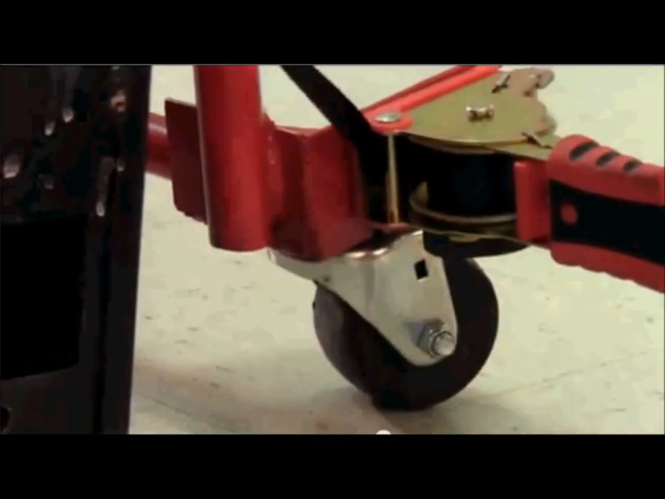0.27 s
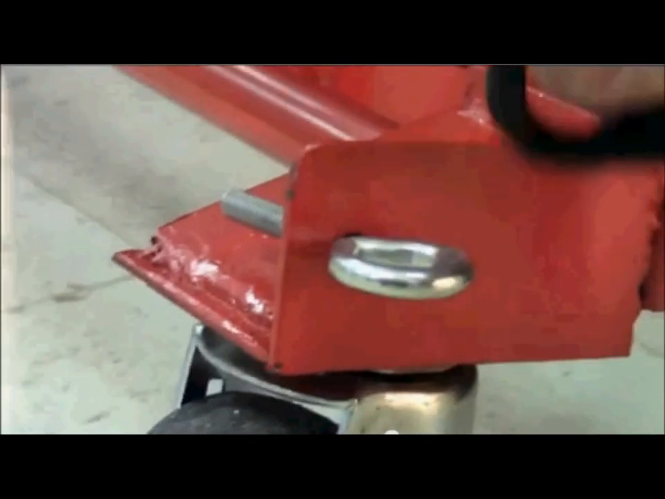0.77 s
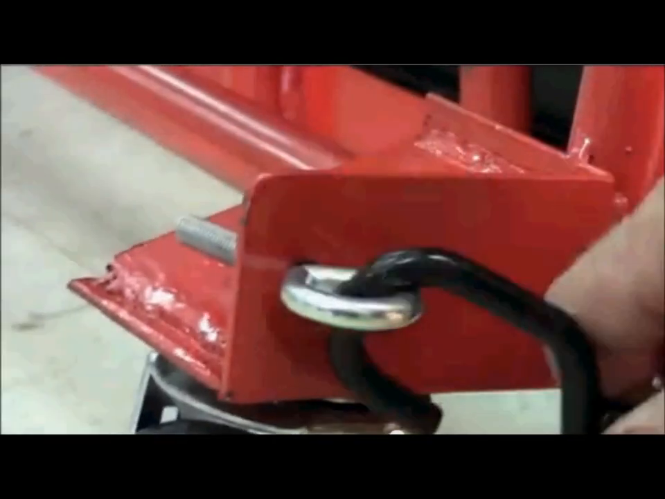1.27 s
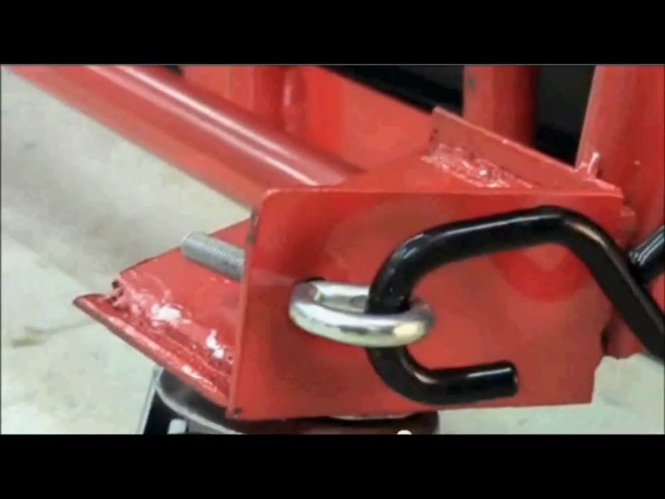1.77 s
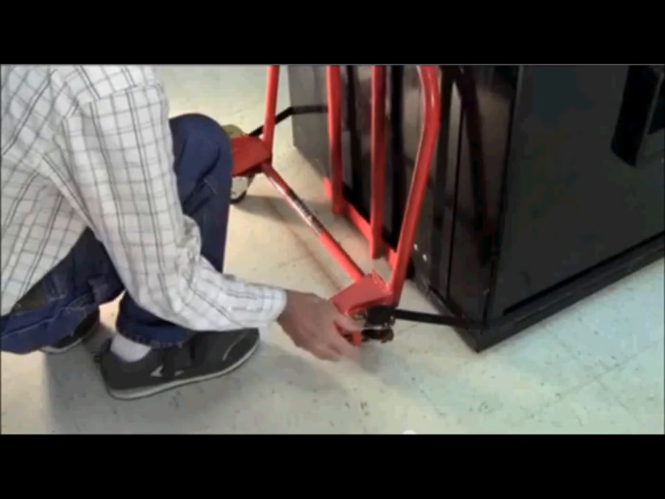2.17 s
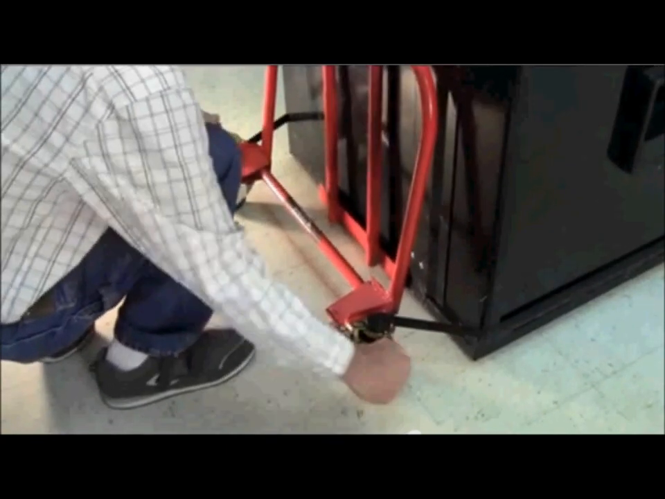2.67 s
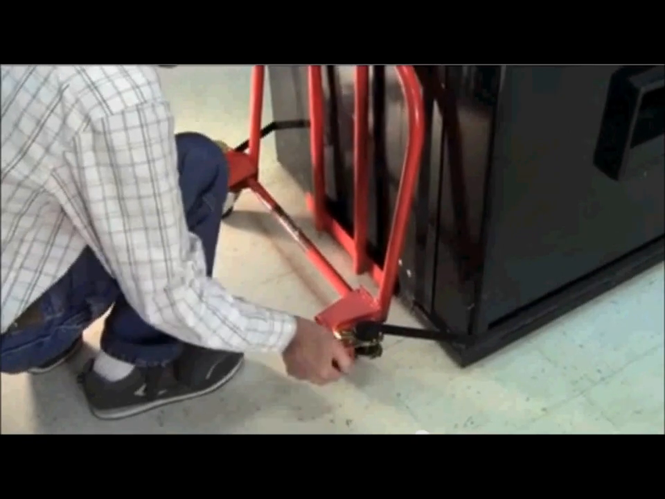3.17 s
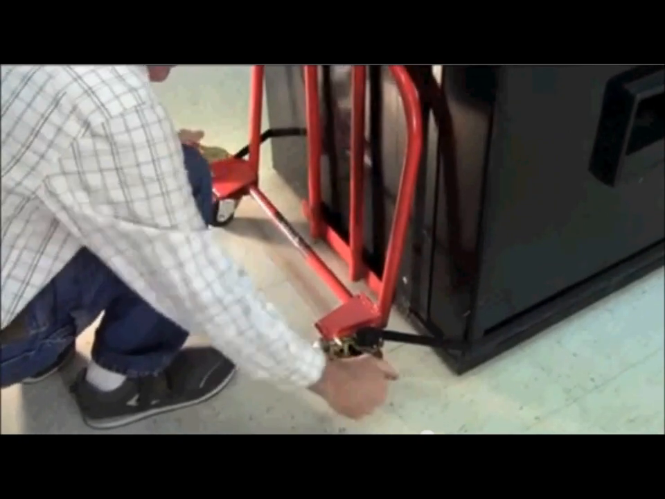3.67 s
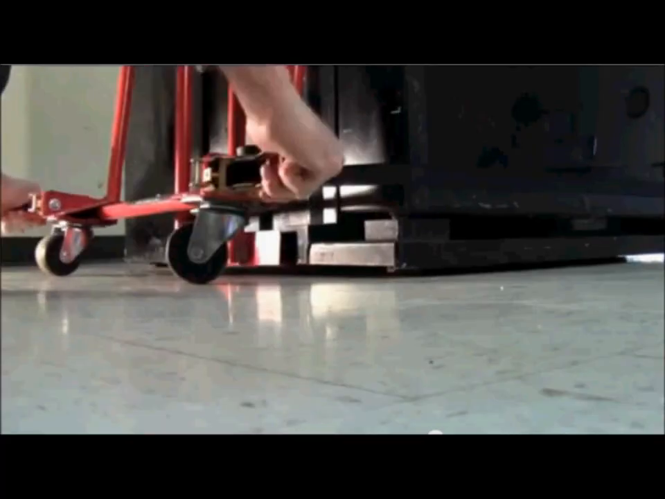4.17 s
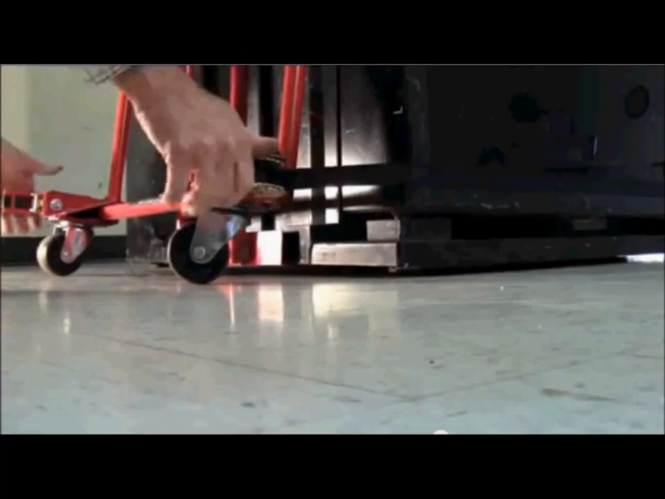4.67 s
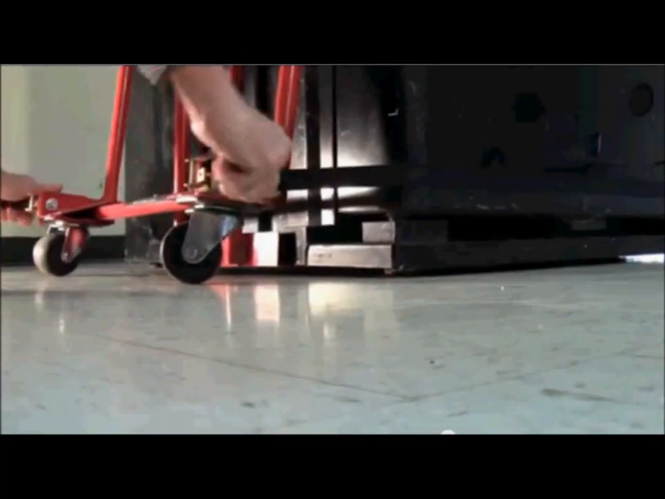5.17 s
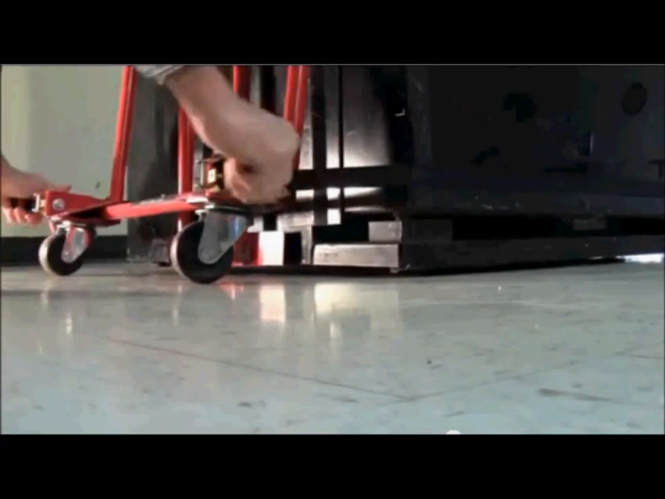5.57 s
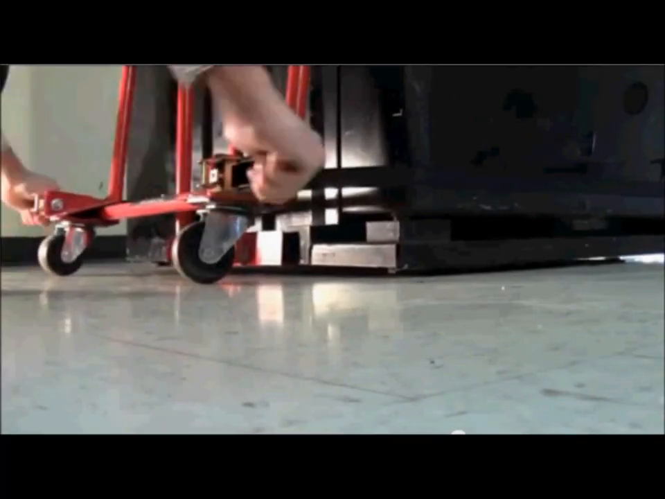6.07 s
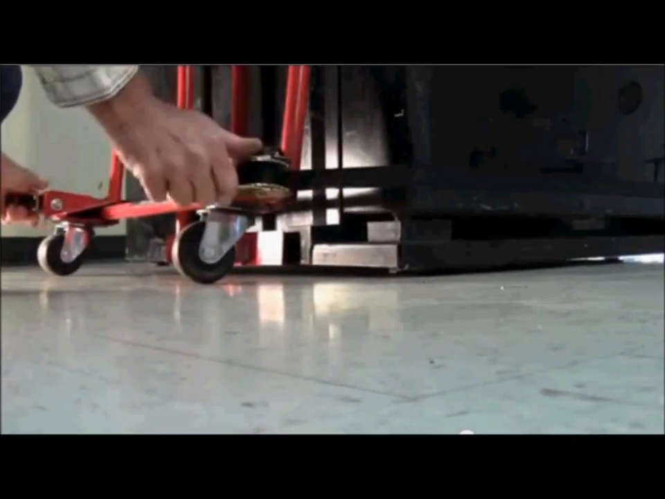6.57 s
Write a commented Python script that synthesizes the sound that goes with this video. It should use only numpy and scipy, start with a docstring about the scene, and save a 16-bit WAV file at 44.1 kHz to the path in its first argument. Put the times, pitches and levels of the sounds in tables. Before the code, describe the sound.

A strap hook scrapes and clanks against a steel dolly, followed by a quieter gap and a dull thud. Then a ratchet is cranked by hand, its pawl snapping over teeth in rapid clusters separated by brief pauses, with buzzing plates, gritty drag and a faint singing tube. Near the end the frame judders and squeaks. Hard indoor room, closer hook, more roomy ratchet.

```python
"""In a hard-floored room, a ratchet strap is cranked tight by hand on a steel moving dolly.
A hook clanks on the frame, then the pawl snaps over the teeth in short bursts: noisy contacts
ring tables of steel resonances. Random slips make the scrapes, buzzes and singing tube; shaped noise
makes the webbing's rub, the casters' rumble and the room's air. Bumps boom in the load, the frame
judders, and the walls return a diffuse tail to the one microphone."""
import sys
import numpy as np
from scipy import signal
from scipy.fft import rfft, irfft, next_fast_len
from scipy.io import wavfile
from scipy.ndimage import uniform_filter1d

SR = 44100
rng = np.random.default_rng(int(sys.argv[2]) if len(sys.argv) > 2 else 0)


def dump(signal):
    """Clip the signal to [-1, 1] and save it as 16-bit WAV at the path in sys.argv[1]."""
    limited = np.clip(np.atleast_2d(signal).T, -1, 1)
    pcm = np.round(limited * 32767).astype(np.int16)
    wavfile.write(sys.argv[1], SR, pcm)


N = 301203
TIME = np.arange(N) / SR
RING_TIME = TIME[:SR // 7]

# resonances of each steel part: f/Hz, width/Hz, relative peak level/dB
PAWL = [(2870, 30, -7), (3066, 73, 5.5), (3361, 80, 8), (3484, 89, 5.5), (3797, 100, -2.5), (3851, 73, 9),
        (4060, 310, 1.5), (4490, 130, 0.5), (4714, 95, 4.5), (5130, 98, 1), (5438, 284, 2), (6403, 420, 2),
        (6650, 270, -28), (7210, 510, -3.5), (7650, 137, 3)]
PAWL_TIP = [(8970, 88, -13), (8770, 86, -12.5), (9052, 80, -6), (10100, 100, -25)]
PLATES = [(1989, 29, 0.5), (2045, 92, 11), (2294, 92, 10), (2402, 25, 10.5), (2433, 32, 8.5),
          (2330, 70, -22.5), (2475, 13, 2)]
FRAME = [(432.7, 16, -0.5), (620, 8.3, -49.5), (790, 8.9, -35), (830, 24, -31), (992, 11, 5.5),
         (1079, 44, 0), (1100, 24, -23), (1290, 32, -3), (1422, 62, 0), (1476, 33, 5), (1585, 38, 5.5),
         (1682, 33, 11.5), (1620, 26, -22), (1780, 14, -27.5)]
HOOK = [(995, 82, -3.5), (1030, 150, -12), (1160, 150, -19), (1386, 18, 2), (1520, 23, -0.5), (1632, 73, 2),
        (1793, 90, -4.5), (2107, 93, -0.5), (1976, 140, -5.5), (2357, 35, 1)]
# strokes in which the pawl drags over the teeth: start t/s, end t/s, grit level/dB
STROKES = [(1.572, 1.753, -38), (1.938, 2.226, -32.5), (2.415, 2.568, -30.5), (2.694, 3.093, -37.5),
           (3.236, 3.392, -35.5), (3.473, 3.772, -37), (3.968, 4.157, -42.5), (4.537, 4.838, -46.5),
           (5.132, 5.29, -44), (5.523, 5.695, -43), (5.867, 6.087, -42.5), (6.178, 6.563, -53)]
# the pawl snaps over a tooth, a few times in each swing of the handle:
# t/s, pawl level/dB, side plate level/dB (both before the part gains), f/Hz where the plates ring most
SNAPS = [(1.613, -9, -7, 2290), (1.6889, -12.5, -10.5, 2175), (1.9612, -11, -13, 2300),
         (1.9877, -12, -8.5, 2180), (2.0224, -8.5, -10, 2200), (2.0318, -13, -10, 2370),
         (2.0841, -6.5, -9.5, 2030), (2.142, -10.5, -11.5, 2100), (2.2235, -9, -10.5, 2350),
         (2.4237, -9.5, -12.5, 2460), (2.4433, -11, -7, 2130), (2.4625, -8.5, -15, 2400),
         (2.4971, -11.5, -15.5, 1960), (2.5384, -12.5, -12, 2500), (2.6067, -14.5, -18, 1950),
         (2.7119, -15.5, -12, 2090), (2.7224, -13.5, -10, 2010), (2.825, -13.5, -12.5, 2300),
         (2.8486, -11.5, -10, 2380), (2.8802, -11.5, -17, 2420), (2.9142, -8.5, -15.5, 1890),
         (2.9288, -12.5, -11.5, 2300), (2.9725, -8, -11.5, 2320), (2.9834, -8.5, -11.5, 2040),
         (3.036, -13.5, -17, 2480), (3.252, -7.5, -7.5, 1910), (3.2969, -16, -12, 2340),
         (3.3501, -10.5, -29, 2350), (3.4633, -13.5, -15, 2520), (3.5401, -13.5, -13, 2290),
         (3.5788, -10.5, -6, 2430), (3.5926, -12.5, -12, 2380), (3.6189, -12.5, -11, 1930),
         (3.6619, -10, -14, 2070), (3.712, -11.5, -10, 2030), (3.7962, -9.5, -10, 2090),
         (4.0193, -12.5, -10, 2300), (4.0664, -9, -14.5, 2400), (4.1209, -12, -11, 1900),
         (4.2442, -10, -12, 2340), (4.561, -9, -12, 2170), (4.5999, -15, -9, 2470),
         (4.6834, -11, -10.5, 1970), (4.753, -11.5, -14, 2300), (4.816, -9.5, -7, 2340),
         (4.9034, -13, -7.5, 2070), (5.1428, -11, -13.5, 2460), (5.1886, -11, -18, 1960),
         (5.2268, -12, -16.5, 2426), (5.2652, -10.5, -15.5, 2500), (5.5383, -11.5, -8, 2000),
         (5.5857, -10.5, -10, 2390), (5.6242, -9, -11.5, 1970), (5.6685, -19, -3.5, 2020),
         (5.877, -14, -7.5, 1915), (5.9359, -14.5, -9.5, 1850), (5.9683, -16.5, -8.5, 2130),
         (5.9988, -14, -13.5, 1950), (6.0426, -15.5, -14, 2360), (6.2105, -17, -9, 2030),
         (6.2611, -16.5, -4, 2020), (6.2751, -11, -6, 2050), (6.352, -14, -9.5, 2310),
         (6.3929, -12, -11, 2320), (6.4213, -15.5, -10.5, 2320), (6.4643, -11.5, -9, 2080),
         (6.7105, -14, -4, 1970), (6.777, -12, -10.5, 2000), (6.8172, -10.5, -11, 2020)]


def from_db(db):
    """Decibels to amplitude gain."""
    return 10 ** (np.asarray(db) / 20)


def rms_one(x):
    """Scale to rms 1."""
    return x / np.sqrt(np.mean(x ** 2) + 1e-20)


def at_hz(points, hz):
    """Read a table of f/Hz and value on a log-frequency axis."""
    points = np.array(points)
    return np.interp(np.log(hz + 1e-9), np.log(points[:, 0]), points[:, 1])


def in_time(rows):
    """Each column of a curve over t/s, read at every sample."""
    s, *columns = np.transpose(rows)
    return [np.interp(TIME, s, column) for column in columns]


def band(x, low_hz, high_hz, order=4):
    """Causal band-pass."""
    edges_hz = [low_hz, min(high_hz, .45 * SR)]
    return signal.sosfilt(signal.butter(order, edges_hz, "band", fs=SR, output="sos"), x)


def add(track, s, sound):
    """Mix a sound in at time s."""
    start = min(max(round(s * SR), 0), N)
    track[start:start + len(sound)] += sound[:N - start]


def noise(spectrum):
    """Steady noise coloured by a table of f/Hz and relative level/dB, rms 1."""
    size = next_fast_len(N)
    hz = np.arange(size // 2 + 1) * SR / size
    coloured = rfft(rng.standard_normal(size)) * from_db(at_hz(spectrum, hz))
    return rms_one(irfft(coloured, size)[:N])


def rings(modes, low_hz, high_hz):
    """One dying sine per resonance, within the band the part radiates; a wide resonance dies fast."""
    hz, width, db = np.transpose(modes)[:, :, None]
    # the factor width keeps each spectral peak at its listed level
    envelope = from_db(db) * width * np.exp(-np.pi * width * RING_TIME)
    return band(envelope * np.sin(2 * np.pi * hz * RING_TIME), low_hz, high_hz)


def blow(partials, chatter_s, swell_s=0.0008, size=900):
    """One contact: a chatter of tiny impacts swells, dies and drives the partials; loudest 5 ms at rms 1."""
    # each contact excites the partials a little differently
    body = from_db(2.5 * rng.standard_normal(len(partials))) @ partials
    t = TIME[:size]
    force = (1 - np.exp(-t / swell_s)) * np.exp(-t / max(chatter_s, 1e-3))
    sound = signal.fftconvolve(force * rng.standard_normal(size), body)
    return sound / np.sqrt(uniform_filter1d(sound[:size] ** 2, size=220).max())


def friction(partials, slips_per_s):
    """Random small slips excite a set of resonances; rms 1."""
    slips = (rng.random(N) < slips_per_s / SR) * rng.standard_normal(N)
    return rms_one(signal.oaconvolve(slips, partials.sum(axis=0))[:N])


def swell(start, peak, end):
    """Contact pressure that builds and lets go; silent where the end precedes the start."""
    return np.interp(TIME, [start, peak, end], [0, 1, 0])


def push(start, end, rise_s, fall_s):
    """An effort full from start to end: it rises in a line before and dies away after."""
    rise = np.clip(1 + (TIME - start) / rise_s, 0, 1)
    return rise * np.exp(-np.clip((TIME - end) / fall_s, 0, 20))


def webbing():
    """Webbing rubs through the hands and, with each stroke, onto the spool, which then settles."""
    # how firmly the webbing slides through the hands: t/s, rub level/dB before the gain
    hand_rub = [(0, -28), (.42, -43), (.68, -31.5), (.97, -47.5), (1.3, -59), (1.55, -39.5), (1.95, -51.5),
                (2.1, -28), (2.45, -38), (2.66, -27.5), (3.45, -42.5), (4.28, -42), (4.48, -30.5),
                (4.87, -30.5), (4.97, -41.5), (5.24, -35.5), (5.5, -39.5), (6.83, -39.5)]
    # colour of the rub: f/Hz, relative level/dB per Hz
    rub_spectrum = [(100, -24), (180, -14.5), (380, 1.5), (550, -3), (780, 10.5), (1100, 6.5), (1500, 2),
                    (2400, 0), (3200, -21.5), (6000, -21.5), (10000, -38.5), (13000, -90)]
    gain_db, spool_db, settle_s = -5.5, -47, 0.059
    winding = sum(push((start + end) / 2, end, (end - start) / 2, settle_s) for start, end, _ in STROKES)
    strength = from_db(in_time(hand_rub)[0] + gain_db) + from_db(spool_db) * winding
    return strength * noise(rub_spectrum)


def casters():
    """The floor rumbles under the dolly, more strongly at each shove."""
    # shoves of the dolly on its casters: t/s, rumble level/dB before the gain
    shove_rows = [(.03, -45), (.68, -48), (1.36, -40), (1.55, -45.5), (2.029, -31.5), (2.47, -40.5),
                  (2.66, -43), (3.12, -46), (3.57, -40), (3.95, -43.5), (4.11, -51), (4.48, -42),
                  (4.77, -33.5), (4.87, -39.5), (5.02, -41), (5.23, -45.5), (6.72, -47)]
    # colour of the rumble: f/Hz, relative level/dB per Hz
    rumble_spectrum = [(11, -34), (18, 5.5), (64, -9.5), (97, -10.5), (150, -17), (225, -15.5),
                       (260, -15.5), (340, -44), (570, -120)]
    rest_db, gain_db = -58.5, -2.5
    shoves = sum(from_db(db + gain_db) * push(s, s, rise_s=0.045, fall_s=0.048) for s, db in shove_rows)
    return (from_db(rest_db) + shoves) * noise(rumble_spectrum)


def room_air():
    """The air of the room is a steady, mostly low noise."""
    # colour of the air: f/Hz, relative level/dB per Hz
    air_spectrum = [(18, -30.5), (30, -4), (45, -9.5), (120, -4), (190, -15.5), (290, -11), (480, -16),
                    (900, -21), (1200, -38), (2300, -35), (3000, -35.5), (8000, -33), (9300, -43),
                    (11000, -60.5), (14000, -100)]
    return from_db(-57.5) * noise(air_spectrum)


def scraping():
    """Stick-slip drives frame and plates, with hiss, squeal, a singing tube, buzz and the pawl's grit."""
    # strap and hook scraping on steel: start, peak and end t/s, then grind, hiss and squeal level/dB
    scrapes = [(-.1, 0, 0.1, -38, -49, -59), (0.06, 0.107, 0.39, -34, -50, -52),
               (0.58, .64, 0.67, -49, -58.5, -70), (1.523, 1.58, 1.2, -32.5, -48.5, -70),
               (2.317, 2.361, 2.42, -30, -46, -74), (6.575, 6.614, 6.66, -20, -32, -23.5),
               (6.683, 6.695, 6.75, -23, -41, -21)]
    # the loose handle buzzes against the side plates: start, peak and end t/s, level/dB
    buzzes = [(1.903, 1.927, 1.9, -35.5), (3.16, 3.188, 3.25, -33), (4.9, 4.925, 4.3, -25),
              (5.038, 5.046, 5.13, -23), (5.225, 5.303, 5.32, -22.5), (5.432, 5.469, 5.47, -20.5),
              (6.18, 6.19, 6.24, -31)]
    # a frame tube sings with two of the strokes: t/s, level/dB
    tube_song = [(3.92, -60), (4.0, -41), (4.15, -37.5), (4.37, -43), (4.45, -100), (5.15, -62),
                 (5.24, -37), (5.35, -35), (5.42, -47), (5.47, -100)]
    # resonances of the squeal and of the singing tube: f/Hz, width/Hz, relative peak level/dB
    squeal_modes = [(3376, 80, 6.5), (3900, 44, 13.5), (4200, 70, -16), (5270, 250, -10), (7240, 200, -4.5),
                    (7500, 92, -1.5), (8530, 210, -1.5), (9060, 90, -4)]
    tube_modes = [(882, 16, 6.5), (972, 5.8, 17), (1020, 8.6, -8)]

    treble = rings(PAWL + PAWL_TIP, low_hz=2520, high_hz=9180)
    grind = friction(rings(FRAME + PLATES, low_hz=447, high_hz=2650), slips_per_s=1500)
    hiss = friction(treble, slips_per_s=2800)
    squeal = friction(rings(squeal_modes, low_hz=3120, high_hz=9800), slips_per_s=3100)
    buzz = friction(rings(PLATES, low_hz=2010, high_hz=2654), slips_per_s=8200)
    low_grit = friction(rings(HOOK, low_hz=890, high_hz=2550), slips_per_s=300)
    grit = friction(treble, slips_per_s=920) + from_db(3.0) * low_grit
    tube = friction(rings(tube_modes, low_hz=820, high_hz=1160), slips_per_s=2200)

    # the tube is silent outside its curve
    out = from_db(np.interp(TIME, *np.transpose(tube_song), left=-np.inf, right=-np.inf)) * tube
    for start, peak, end, grind_db, hiss_db, squeal_db in scrapes:
        scrape = from_db(grind_db) * grind + from_db(hiss_db) * hiss + from_db(squeal_db) * squeal
        out += swell(start, peak, end) * scrape
    for start, peak, end, db in buzzes:
        out += from_db(db) * swell(start, peak, end) * buzz
    for start, end, db in STROKES:
        drag = np.interp(TIME, [start, start + .02, end - .02, end], [0, 1, 1, 0])
        out += from_db(db) * grit * drag
    return out


def hook():
    """The steel hook strikes the frame's plate and buzzes against it for a moment."""
    # clanks and chatters on the frame: t/s, clank level/dB, bright clink level/dB (both before the gain)
    clanks = [(0.092, -19, -43), (0.107, -24, -38), (0.12, -20, -39), (0.232, -29, -46), (0.466, -31, -49),
              (0.512, -27, -39), (0.52, -10.5, -19), (0.621, -25.5, -35.5), (0.689, -26.5, -44),
              (0.788, -5.5, -10.5), (1.452, -30, -56), (1.462, -31, -36)]
    # resonances of the clink: f/Hz, width/Hz, relative peak level/dB
    clink_modes = [(3340, 56, -7), (3350, 66, -5), (3620, 150, 1), (3760, 26, -2), (3900, 90, -9.5),
                   (4610, 110, -18), (5300, 300, -21), (6470, 310, -14.5), (7440, 280, -10.5),
                   (8500, 480, -24)]
    gain_db = -5.0
    out = np.zeros(N)
    plate = rings(HOOK, low_hz=703, high_hz=2460)
    clink = rings(clink_modes, low_hz=3020, high_hz=9700)
    for s, clank_db, clink_db in clanks:
        add(out, s - .001, from_db(clank_db + gain_db) * blow(plate, 0.0085, size=1800))
        add(out, s - .001, from_db(clink_db + gain_db) * blow(clink, 0.0057, size=1800))
    return out


def load():
    """Soft bumps boom in the load; a jolt makes the whole frame judder."""
    # dull bumps against the load: t/s, level/dB, upper edge f/Hz, contact tick level/dB
    bumps = [(1.344, -25.5, 760, -54.5), (2.011, -45, 130, -72), (2.644, -37, 480, -83),
             (3.538, -32.5, 135, -61), (4.461, -39, 514, -56), (4.755, -52, 109, -70)]
    # the dolly jolts under the pull: t/s, level/dB, judder decay t/s
    jolts = [(6.271, -12, 0.029)]
    # resonances of the load: f/Hz, width/Hz, relative peak level/dB
    load_modes = [(84.6, 22, 3), (121, 52, 9), (159, 78, 5.5), (197, 37, -17), (294, 76, 11), (446, 11, -6),
                  (620, 47, -2.4)]
    out = np.zeros(N)
    tick = rings(PAWL, low_hz=5100, high_hz=5800)
    for s, db, edge_hz, tick_db in bumps:
        boom = rings(load_modes, low_hz=69, high_hz=edge_hz)
        add(out, s, from_db(db) * blow(boom, 0.022, size=2500))
        add(out, s - .002, from_db(tick_db) * blow(tick, .002))
    for s, db, judder_s in jolts:
        whole_frame = rings(FRAME + HOOK, low_hz=500, high_hz=1900)
        add(out, s, from_db(db) * blow(whole_frame, judder_s, size=7000))
    return out


def contacts():
    """Share each snap and knock among the parts: t/s, pawl, tip, plates and frame level/dB, plates' f/Hz."""
    # duller knocks as the handle takes up its play: t/s, level/dB before the shares, plates' f/Hz
    knock_rows = [(1.5427, -25, 2320), (1.9162, -16.5, 2000), (2.1754, -10, 2000), (3.166, -14.5, 2060),
                  (3.6492, -4, 2140), (3.923, -21, 2300), (3.983, -14, 2420), (4.2544, -9.5, 2400),
                  (4.3314, -11.5, 2010), (4.6555, -9.5, 2080), (5.0606, -9.5, 2300), (5.0724, -14, 2310),
                  (5.4456, -14.5, 2440), (5.6522, -1.5, 1980), (6.4857, -8, 2140), (6.4994, -28, 2010),
                  (6.546, -14, 2200), (6.5799, -14.5, 2360), (6.6529, -6, 1980)]
    tip_db, frame_db = -14.5, -8.0   # how far a snap's tip and frame lie below it
    damping_db_per_s = 0.64   # the tightening strap damps the frame
    rows = []
    for s, pawl_db, plate_db, hz in SNAPS:
        snap_frame_db = (pawl_db + plate_db) / 2 + frame_db - damping_db_per_s * s
        rows.append((s, pawl_db, pawl_db + tip_db, plate_db, snap_frame_db, hz))
    for s, db, hz in knock_rows:
        rows.append((s, db - 12, db - 33, db - 4.5, db - 16, hz))
    return rows


def favoured(plates, pitch_hz):
    """A point of contact favours the plates' partials around one pitch, by up to 10 dB."""
    nearness = np.exp(-((np.transpose(PLATES)[0] - pitch_hz) / 107) ** 2)
    return from_db(10 * nearness)[:, None] * plates


def ratchet():
    """The pawl slides off a tooth's crest, drops and rebounds; side plates answer, and the frame behind."""
    pawl_gain_db, tip_gain_db, plate_gain_db, frame_gain_db = -10.0, -7.0, -2.0, -4.0
    slide_db, chatter_s = -16.5, 0.0032
    out = np.zeros(N)
    pawl = rings(PAWL, low_hz=3065, high_hz=7720)
    tip = rings(PAWL_TIP, low_hz=8120, high_hz=10630)
    plates = rings(PLATES, low_hz=1810, high_hz=2512)
    frame = rings(FRAME, low_hz=450, high_hz=2090)
    for s, pawl_db, tip_db, plate_db, frame_db, pitch_hz in contacts():
        struck = favoured(plates, pitch_hz)
        add(out, s - .005, from_db(plate_db + slide_db) * blow(struck, 0.0069))   # the slide before
        add(out, s - .0008, from_db(tip_db + tip_gain_db) * blow(tip, 0.79 * chatter_s))
        add(out, s - .0005, from_db(pawl_db + pawl_gain_db) * blow(pawl, chatter_s))
        add(out, s - .0012, from_db(plate_db + plate_gain_db) * blow(struck, chatter_s))
        add(out, s - .0006, from_db(frame_db + frame_gain_db) * blow(frame, 2 * chatter_s))
    # after each snap the pawl rebounds once, typically 11 ms later and 11 dB weaker
    for s, pawl_db, _, _ in SNAPS:
        late, hard = rng.standard_normal(2)
        rebound_db = pawl_db + pawl_gain_db - 11 + hard
        add(out, s + .011 * np.exp(0.34 * late), from_db(rebound_db) * blow(pawl, chatter_s))
    return out


def room(x, build_s=0.002):
    """Diffuse reflections build up quickly, then die at a rate of their own in each band."""
    # reverberation time: f/Hz, t60/s
    room_t60 = [(200, 0.6), (900, 0.12), (2200, 0.51), (3500, 0.52), (6000, 0.42), (9000, 0.52)]
    # strength of the reflections: f/Hz, level/dB
    room_db = [(200, -13), (900, 2.5), (2200, -5), (4500, -5.5), (9000, -13)]
    t, response = TIME[:SR], 0
    edges = np.geomspace(60, 14000, 13)
    for low, high in zip(edges, edges[1:]):
        hz = np.sqrt(low * high)
        decay = from_db(-60 * t / at_hz(room_t60, hz)) * (1 - np.exp(-(t / build_s) ** 2))
        tail = rng.standard_normal(len(t)) * decay / np.sqrt(np.sum(decay ** 2))
        response = response + from_db(at_hz(room_db, hz)) * band(tail, low, high, order=3)
    return signal.fftconvolve(x, response)[:N]


def scene():
    """Steel radiates differently in each direction: one way to the microphone, another to the walls."""
    # how distant the dolly sounds: t/s, level/dB sent to the room
    distance = [(.5, -1.5), (.8, -5.5), (2.4, 0.34), (4.2, -0.3), (6.83, -0.7)]
    scrape = scraping()
    # the contacts are drawn afresh for each direction
    direct, to_walls = [ratchet() + hook() + load() + scrape for direction in range(2)]
    reflected = room(from_db(in_time(distance)[0]) * to_walls)
    return (direct + reflected + webbing() + casters() + room_air())[None]


def record(dry):
    """The loudest peaks are flattened and the top is cut steeply."""
    rounded = dry / (1 + (dry / .85) ** 4) ** .25
    cutoff_hz = 10400
    return signal.sosfilt(signal.butter(24, cutoff_hz, fs=SR, output="sos"), rounded)


dry = scene()
out = record(dry)
dump(out)
```